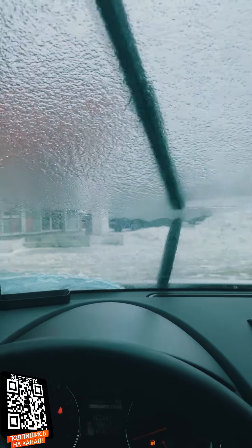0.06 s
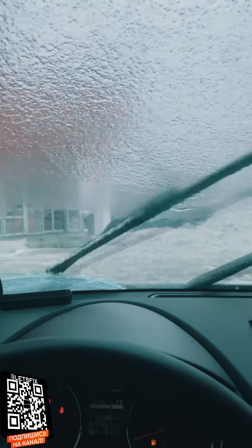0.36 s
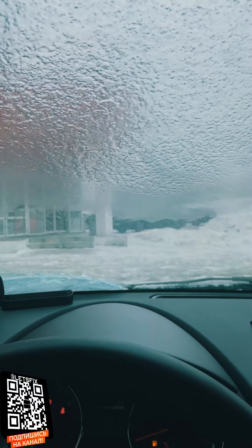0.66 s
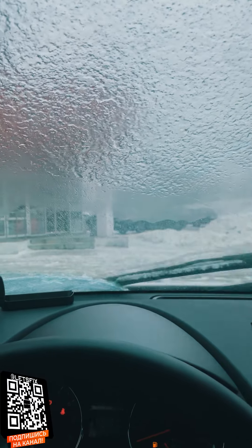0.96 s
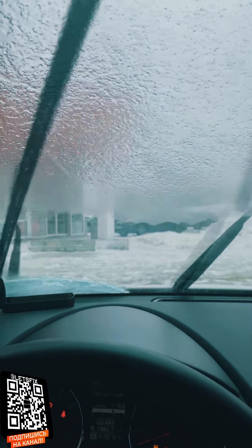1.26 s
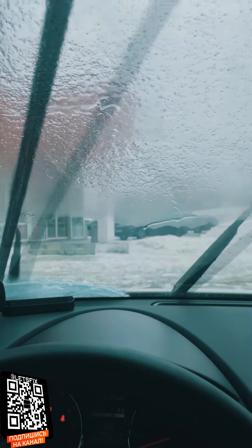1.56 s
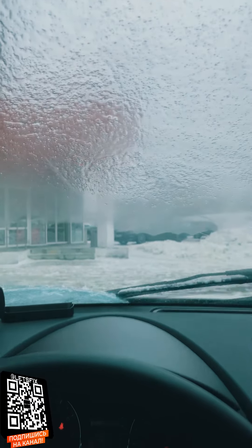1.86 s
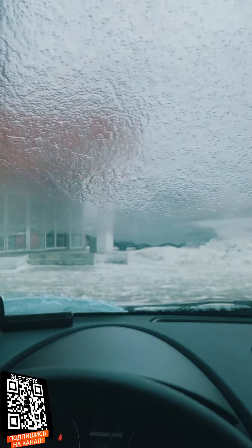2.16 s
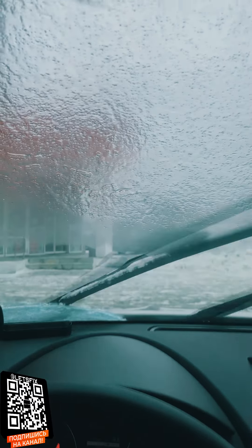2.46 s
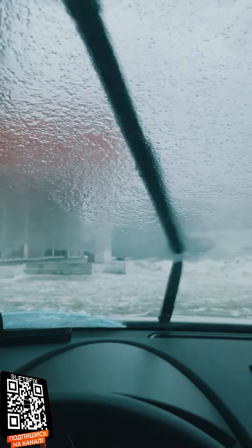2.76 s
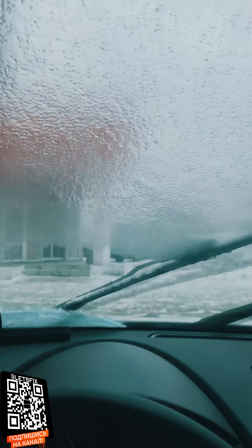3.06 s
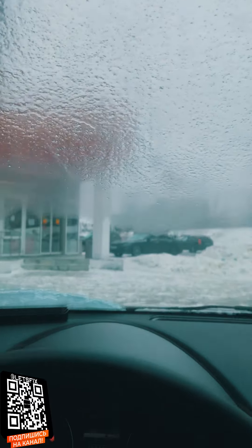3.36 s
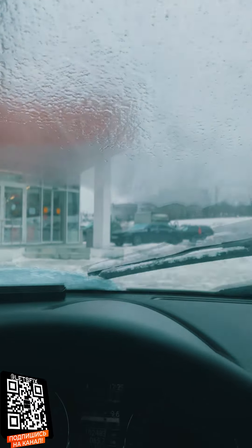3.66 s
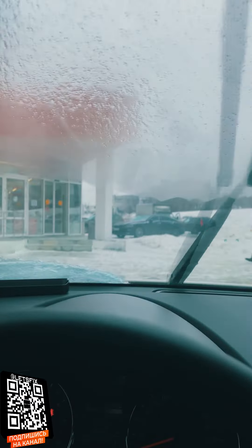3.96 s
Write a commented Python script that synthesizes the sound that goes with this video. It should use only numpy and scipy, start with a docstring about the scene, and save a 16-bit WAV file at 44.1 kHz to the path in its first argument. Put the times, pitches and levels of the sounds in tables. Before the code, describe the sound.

Car wipers rasp rhythmically across a frozen windscreen, with engine and fan rumbling underneath.

```python
"""Wipers on an iced windscreen, from the driver's seat.

Rubber slips over ice, four scrapes a cycle: hiss, rasp, glass groan, low rub, arm judder.
The lip rings and squeaks; loose ice crunches. The linkage knocks; the blades tick as they flip.
Engine and fan rumble throughout. A small motor, likely the washer pump, whines at the start."""
import sys
import numpy as np
from scipy.fft import rfft, irfft, next_fast_len
from scipy.io import wavfile
from scipy.ndimage import map_coordinates

SR = 44100
rng = np.random.default_rng(int(sys.argv[2]) if len(sys.argv) > 2 else 0)


def master_out(mix):
    """Clip the mix to full scale and print it as 16-bit PCM to the path in sys.argv[1]."""
    frames = np.transpose(np.atleast_2d(mix))
    ceiling = np.clip(frames, -1, 1)
    pcm = np.round(ceiling * 32767).astype(np.int16)
    wavfile.write(sys.argv[1], SR, pcm)


N = 176400

RISE, FALL, SETTLE, LIFT = range(4)  # sweep up, sweep down, short run to the bottom, short run off it
# Scrapes. Each row: start and end in seconds, treble and body offsets in dB, kind.
SCRAPES = [(-.32, 0.114, -4, 0, RISE), (0.123, 0.514, 1, 1.5, FALL), (0.508, 0.734, 3.5, -1, SETTLE),
           (0.794, 0.994, 0.5, 0.5, LIFT), (0.983, 1.439, -4, -0.5, RISE), (1.443, 1.833, 0, 1.5, FALL),
           (1.819, 2.06, 1.5, -1, SETTLE), (2.114, 2.314, 0.5, 0, LIFT), (2.301, 2.753, -4.5, 0.5, RISE),
           (2.756, 3.144, -1, 0.5, FALL), (3.133, 3.368, 2, -0.5, SETTLE), (3.429, 3.626, 1, -2, LIFT),
           (3.61, 4.095, -5.5, -2, RISE)]
# Scrape shapes by kind, in even time steps. Each row: hiss, rasp, groan, rub and judder in dB.
RISE_SHAPE_DB = [(-40, -37, -42, -65, -54), (-38.5, -37, -49.5, -55, -43.5),
                 (-38.5, -36.5, -43, -37.5, -32.5), (-32.5, -35, -40.5, -40.5, -32),
                 (-32.5, -31.5, -37.5, -34, -34), (-34, -35.5, -39, -35, -31.5), (-47, -49, -40, -35, -28)]
FALL_SHAPE_DB = [(-42.5, -42, -40, -38.5, -24.5), (-36.5, -42, -42.5, -44.5, -36.5),
                 (-38, -40, -44, -41, -36), (-45, -40.5, -48.5, -53, -35.5), (-40, -36, -40.5, -45, -44.5)]
SETTLE_SHAPE_DB = [(-49.5, -50, -57, -87, -73), (-45.5, -44, -44.5, -49, -44),
                   (-45.5, -43, -37.5, -39, -46), (-51.5, -48.5, -40, -40, -44),
                   (-46, -35.5, -36, -31, -15)]
LIFT_SHAPE_DB = [(-52, -43.5, -42.5, -42.5, -39), (-40.5, -42, -39, -39.5, -35.5),
                 (-45, -49, -50, -45, -68)]
# Noise spectra. Each row: frequency in Hz, relative density in dB.
ICE_HISS_SPECTRUM = [(500, -12), (1500, 2), (2200, 2.5), (3400, -5.5), (4200, 0.5), (5200, 0), (6500, -5),
                     (8000, -8.5), (10000, -11), (12300, -14), (14000, -23), (15100, -58)]
BLADE_RASP_SPECTRUM = [(700, -4.5), (1400, -7.5), (1950, -3), (2200, 0), (2500, 4), (2900, 2), (3250, 0),
                       (3600, 1.5), (4200, -13.5), (7000, -28)]
GLASS_GROAN_SPECTRUM = [(250, -3), (480, -8), (630, 0), (850, 0.5), (1100, -2.5), (1500, -7), (2500, -26),
                        (6000, -33)]
LOW_RUB_SPECTRUM = [(120, -10), (230, -3.5), (300, 3.5), (400, 1), (500, 3), (670, -5.5), (820, -8),
                    (1000, -13), (3000, -60)]
ARM_JUDDER_SPECTRUM = [(40, -18), (100, 3), (150, 1.5), (190, 4), (240, -1), (300, -6.5), (450, -33.5),
                       (1000, -60)]
RUSTLE_SPECTRUM = [(700, -16), (1500, 2.5), (2700, 0), (3500, -7), (5000, -8.5), (8000, -21), (12000, -21),
                   (15000, -45)]
TICK_SPECTRUM = [(200, -15), (700, 17), (1500, 5), (3000, 11), (5000, -6), (9000, -21), (15000, -26)]
RUMBLE_SPECTRUM = [(15, -55), (25, -23), (31, -5.5), (55, 0), (85, 2), (120, -4.5), (170, -4.5), (240, -6),
                   (320, -13.5), (500, -20.5), (1000, -29), (3000, -93)]
FAN_SPECTRUM = [(100, 21), (300, 15), (500, 1.5), (800, -7), (1300, -4), (3000, -9), (5000, -31.5),
                (10000, -38), (15000, -37)]
# Blade-to-ear paths. Each row: delay at the bottom in ms, delay at the top in ms, gain.
EAR_PATHS = [(.9, 1.77, 0.1), (1.7, 2.8, 0.21), (3.2, 5.0, 0.17), (5.6, 4.4, 0.15)]
# Rubber lip modes. Each row: frequency in Hz, level against the rasp in dB.
LIP_RESONANCES = [(1960, -17), (2520, -10), (2850, -10.5), (3180, -10.5), (4220, -19)]
# Squeaks. Each row: centre in seconds, level in dB, pitch in Hz.
RUBBER_SQUEAKS = [(0.452, -35, 2940), (0.563, -37.5, 2840), (0.887, -36, 3310), (0.941, -32.5, 3110),
                  (1.671, -34, 3100), (1.765, -38, 2760), (1.904, -32, 3000), (2.253, -36.5, 3150),
                  (2.471, -32.5, 2890), (3.003, -34, 2820), (3.088, -32, 2520), (3.195, -39, 3275),
                  (3.901, -33, 3000)]
# Squeak modes. Each row: pitch ratio, relative level in dB.
SQUEAK_PARTIALS = [(0.877, -11), (0.996, -5.5), (1.091, -17)]
# Bites into the ice. Each row: start in seconds, level in dB.
ICE_BITES = [(.143, -44.5), (.829, -49), (1.004, -51), (1.468, -49), (1.844, -53), (2.15, -55), (2.79, -47),
             (3.448, -55)]
# Loose ice rustle. Each row: time in seconds, level in dB.
RUSTLE_LEVEL_DB = [(0, -61), (.76, -58.5), (1.44, -64), (2.08, -61), (2.75, -61.5), (3.4, -62.5), (4, -69)]
# Knocks. Each row: start in seconds, level in dB, pitch in Hz, T60 in seconds.
LINKAGE_KNOCKS = [(0.377, -14, 205, 0.11), (.757, -7, 129, 0.081), (0.761, -14.5, 80, 0.14),
                  (0.796, -21, 196, .12), (2.07, -18.5, 96, 0.18), (2.071, -20.5, 176, 0.22),
                  (2.105, -11.5, 122, 0.11), (2.455, -25, 187.5, 0.083), (2.693, -12.5, 202.4, 0.12),
                  (2.787, -16, 160.7, 0.11), (2.812, -15, 114.5, 0.17), (3.273, -10.5, 114, 0.11)]
# Blade flips. Each row: start in seconds, level in dB.
FLIP_TICKS = [(0.12, -64), (.781, -48), (.797, -45), (2.044, -55), (2.075, -50.5), (2.117, -43)]
# Pump speed. Each row: time in seconds, rotation rate in Hz.
PUMP_SPEED_HZ = [(0, 366.6), (.25, 368), (.5, 364), (.74, 369), (.8, 363), (.87, 370)]
# Pump envelope. Each row: time in seconds, level in dB.
PUMP_LEVEL_DB = [(0, -39), (.3, -36.5), (.55, -38), (.78, -37.5), (.822, -36.5), (.875, -80)]
# Pump harmonics. Each row: order, relative level in dB.
PUMP_HARMONICS = [(1, 0.5), (2, -22)]
# Engine and fan tones. Each row: frequency in Hz, level in dB.
HUM_TONES = [(111.8, -42), (53.36, -44.5)]
# Stereo likeness, nearly total in the bass and in narrow treble bands.
# Each row: frequency in Hz, left-right correlation.
STEREO_CORRELATION = [(100, .9995), (170, .985), (250, .96), (450, .9), (900, .67), (1400, .35),
                      (2000, .55), (3000, .6), (3800, .73), (4700, .6), (6000, .84), (6700, .88),
                      (7100, .985), (7800, .985), (8400, .8), (9300, .78), (10300, .98), (11900, .7),
                      (12900, .98), (14300, .98)]
# Microphone balance. Each row: frequency in Hz, left minus right in dB.
MIC_BALANCE_DB = [(150, 0), (250, -1), (410, -3.3), (660, -4.8), (1060, -4.5), (1710, -3), (2770, -1.2),
                  (4470, -.4), (6500, 0)]
# Microphone phase. Each row: frequency in Hz, left lead in radians.
MIC_PHASE_RAD = [(100, 0), (250, -.1), (700, -.4), (1400, -.5), (2000, .5), (2600, 1.8), (3300, 1.05),
                 (4500, .9), (5000, .45), (6000, 1.6), (7100, 3.05), (7800, 3.25), (8800, 4.6),
                 (9900, 6.15), (10900, 6.4), (12000, 7.9), (12800, 9.35), (14300, 9.5), (15000, 10.6)]

CYCLE_S, BOTTOM_S = 1.316, 0.775  # full wipe, first bottom turn


def blades():
    """Slips excite ice, blade, glass and arm; uneven ice makes the level flutter."""
    flutter_db, chatter_db, catch_db = 0.9, -0.29, 1.3
    shudder_hz, shudder_db = 187, -6.5  # arm resonance, level against the judder
    uneven_db = flutter_db * wobble(60) + chatter_db * wobble(260)
    hiss, rasp, groan, rub, judder = (pressure(part) for part in range(5))
    rasp *= amp(catch_db * wobble(45))  # rubber catches and frees
    parts = [(hiss, ICE_HISS_SPECTRUM), (rasp, BLADE_RASP_SPECTRUM), (groan, GLASS_GROAN_SPECTRUM),
             (rub, LOW_RUB_SPECTRUM), (judder, ARM_JUDDER_SPECTRUM)]
    scrape = sum(envelope * coloured(slips(), spectrum) for envelope, spectrum in parts)
    arm_tone = np.sqrt(2) * np.sin(phase_rad(shudder_hz * (1 + 0.0495 * wobble(30))))
    ring = rasp * lip_ring()
    shudder = judder * amp(shudder_db + 3.1 * wobble(25.01)) * arm_tone
    return amp(uneven_db) * (scrape + ring + shudder)


def pressure(part, attack_s=0.067, release_s=0.064, drag_db=-32):
    """Envelope of one scrape part: grip, follow the shape, let go, skim between strokes."""
    t, envelope = clock(), np.zeros(N)
    shapes_db = [RISE_SHAPE_DB, FALL_SHAPE_DB, SETTLE_SHAPE_DB, LIFT_SHAPE_DB]
    ease = lambda u: np.sin(np.pi / 2 * np.clip(u, 0, 1)) ** 2
    for start_s, end_s, treble_db, body_db, kind in SCRAPES:
        shape_db = np.array(shapes_db[kind])[:, part]
        on = (t > start_s) & (t < end_s)
        level_db = np.interp(t[on], np.linspace(start_s, end_s, len(shape_db)), shape_db)
        level_db += treble_db if part < 2 else body_db  # treble: hiss and rasp
        grip = ease((t[on] - start_s) / attack_s) * ease((end_s - t[on]) / release_s)
        envelope[on] += amp(level_db) * grip
    skim = amp(drag_db) * envelope.mean() * np.sin(crank_rad())
    return np.hypot(envelope, skim)


def slips(rate_per_s=5000, spread_db=1, roam_ms=0.13):
    """Tiny ice fractures plus noise, combed by paths that change with the swing."""
    fractures = (rng.random(N) < rate_per_s / SR) * amp(spread_db * rng.standard_normal(N))
    direct = unit(fractures * noise_pair()) + 1.06 * noise_pair()
    height = (1 - np.cos(crank_rad())) / 2
    heard = direct.copy()
    for bottom_ms, top_ms, gain in EAR_PATHS:
        delay_ms = bottom_ms + (top_ms - bottom_ms) * height
        delay_ms += roam_ms * wobble(16)  # loudest spot roams along the blade
        source_index = (clock() - delay_ms / 1000) * SR
        heard += gain * np.array([np.interp(source_index, np.arange(N), row) for row in direct])
    return heard


def crank_rad():
    """Wiper drive angle, zero at the bottom turn."""
    return 2 * np.pi * (clock() - BOTTOM_S) / CYCLE_S


def lip_ring(flare_db=7, wander=0.03, rough_rad=0.5):
    """Each mode of the rubber lip flares and drifts on its own as the grip changes."""
    out = np.zeros(N)
    for hz, db in LIP_RESONANCES:
        phase = phase_rad(hz * (1 + wander * wobble(20)))
        flare = unit(amp(flare_db * np.minimum(wobble(32), 1)))
        out += amp(db) * flare * np.sqrt(2) * np.sin(phase + rough_rad * wobble(350))
    return out


def squeaks(half_width_s=0.021, wander=0.02):
    """Slowly dragging rubber: unsteady lip modes swell and fade."""
    t, out = clock(), np.zeros(N)
    for centre_s, db, hz in RUBBER_SQUEAKS:
        on = np.abs(t - centre_s) < 3 * half_width_s
        swell = np.exp(-((t[on] - centre_s) / half_width_s) ** 2)
        knots_s = np.linspace(t[on][0], t[on][-1], 40)
        for ratio, mode_db in SQUEAK_PARTIALS:
            drift = np.interp(t[on], knots_s, rng.standard_normal(len(knots_s)))
            phase = phase_rad(hz * ratio * (1 + wander * drift))
            out[on] += amp(db + mode_db) * swell * np.sin(phase)
    return out


def loose_ice(bite_t60_s=0.12):
    """Crumbs rustle under the blade and crunch as its edge bites."""
    rustle_db = over_time(RUSTLE_LEVEL_DB) + 2.6 * wobble(75)
    rustle = amp(rustle_db) * coloured(slips(), RUSTLE_SPECTRUM)
    crunch = bursts(ICE_BITES, bite_t60_s) * coloured(slips(), ICE_HISS_SPECTRUM)
    return rustle + crunch


def linkage(rise_s=0.013, sag_per_s=0.43, tick_t60_s=0.058):
    """Dull knocks through the car body, sagging in pitch; ticks of the flipping blades."""
    t, knocks = clock(), np.zeros(N)
    for start_s, db, hz, t60_s in LINKAGE_KNOCKS:
        age_s = np.maximum(t - start_s, 0)
        attack = 1 - np.exp(-(age_s / rise_s) ** 2)
        phase = 2 * np.pi * hz * age_s * (1 - sag_per_s * age_s / 2)
        knocks += amp(db - 60 * age_s / t60_s) * attack * np.sin(phase)
    ticks = bursts(FLIP_TICKS, tick_t60_s) * coloured(noise_pair(), TICK_SPECTRUM)
    return knocks + ticks


def pump(wander=0.0047, waver_db=1.7):
    """A small fast motor whines, then fades quickly."""
    phase = phase_rad(over_time(PUMP_SPEED_HZ) * (1 + wander * wobble(31)))
    level = amp(over_time(PUMP_LEVEL_DB) + waver_db * wobble(23.7))
    return level * np.sqrt(2) * sum(amp(db) * np.sin(order * phase) for order, db in PUMP_HARMONICS)


def engine_and_fan(rumble_db=-34, fan_db=-49.5, waver_db=2, jitter_rad=0.78):
    """Low rumble, unsteady tones and the even rush of the fan."""
    rumble = amp(rumble_db) * coloured(noise_pair(), RUMBLE_SPECTRUM)
    hum = np.zeros(N)
    for hz, db in HUM_TONES:
        level = amp(db + waver_db * wobble(9))
        hum += level * np.sqrt(2) * np.sin(2 * np.pi * hz * clock() + jitter_rad * wobble(10))
    fan = amp(fan_db) * coloured(noise_pair(), FAN_SPECTRUM)
    return rumble + hum + fan


def amp(db):
    """Decibels to gain."""
    return 10 ** (np.asarray(db) / 20)


def unit(x):
    """Scale to rms 1."""
    return x / np.sqrt(np.mean(x ** 2) + 1e-20)


def clock():
    """Sample times in seconds."""
    return np.arange(N) / SR


def phase_rad(hz):
    """Running phase of a varying frequency."""
    return 2 * np.pi * np.cumsum(hz) / SR


def noise_pair():
    """Two independent white noises."""
    return rng.standard_normal((2, N))


def over_time(points):
    """Interpolate (seconds, value) rows at every sample."""
    return np.interp(clock(), *np.transpose(points))


def over_hz(points, hz):
    """Interpolate (Hz, value) rows on a log axis."""
    knots_hz, values = np.transpose(points)
    return np.interp(np.log(hz + 1), np.log(knots_hz + 1), values)


def wobble(knots_per_s):
    """Smooth random curve."""
    knots = rng.standard_normal(int(N * knots_per_s / SR) + 4)
    return map_coordinates(knots, [clock() * knots_per_s], mode="nearest")


def bursts(rows, t60_s):
    """Envelope that jumps at each (seconds, dB) row and decays."""
    t = clock()
    return sum((t >= at_s) * amp(db - 60 * np.maximum(t - at_s, 0) / t60_s) for at_s, db in rows)


def filtered(x, response):
    """Apply a complex response, given as a function of Hz."""
    size = next_fast_len(N + SR // 2)
    return irfft(rfft(x, size) * response(np.fft.rfftfreq(size, 1 / SR)), size)[..., :N]


def coloured(pair, spectrum):
    """Two independent signals to partly correlated stereo of rms 1 with this spectrum."""
    def response(hz):
        angle = np.arccos(np.clip(over_hz(STEREO_CORRELATION, hz), -1, 1)) / 2
        return amp(over_hz(spectrum, hz)) * [np.cos(angle), np.sin(angle)]
    mid, side = filtered(pair, response)
    return unit(np.array([mid + side, mid - side]))


def scene():
    """All sources reach two microphones with unequal level and phase."""
    mix = blades() + loose_ice() + squeaks() + linkage() + pump() + engine_and_fan()
    split = np.array([[0.5], [-0.5]])
    balance = lambda hz: amp(split * over_hz(MIC_BALANCE_DB, hz))
    phase_shift = lambda hz: np.exp(1j * split * over_hz(MIC_PHASE_RAD, hz))
    return filtered(mix, lambda hz: balance(hz) * phase_shift(hz))


def record(dry):
    """Steep bass cut and a hard upper band limit."""
    low_hz, top_hz = 29, 15300
    return filtered(dry, lambda hz: (hz < top_hz) / np.sqrt(1 + (low_hz / (hz + 1)) ** 20))


dry = scene()
out = record(dry)
master_out(out)
```